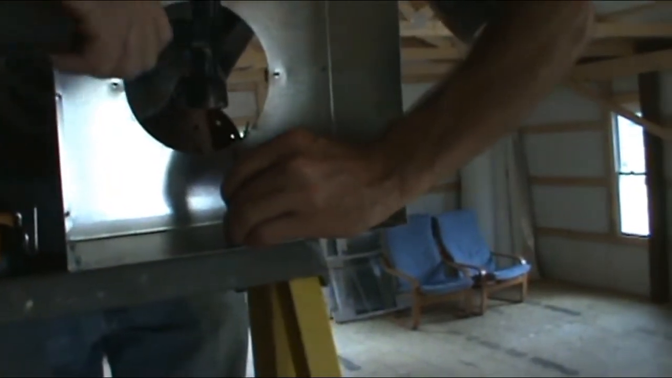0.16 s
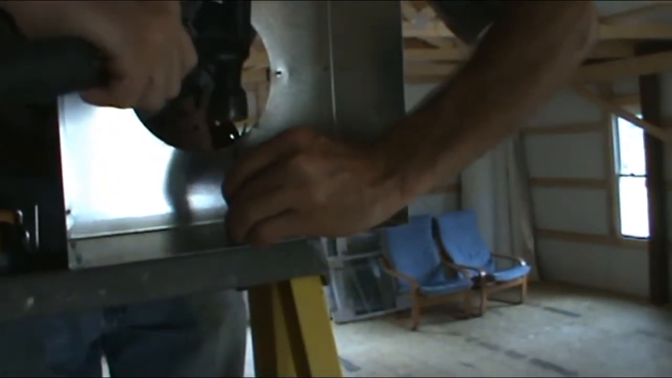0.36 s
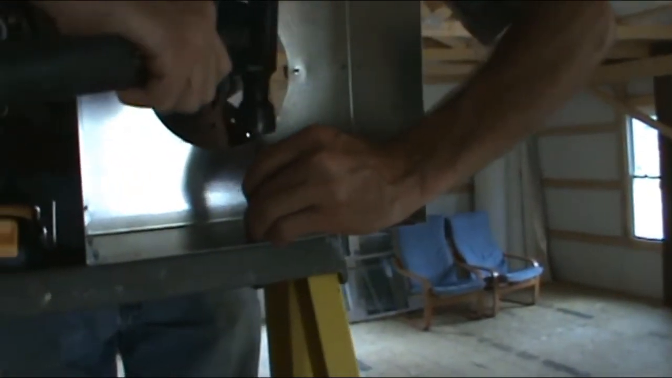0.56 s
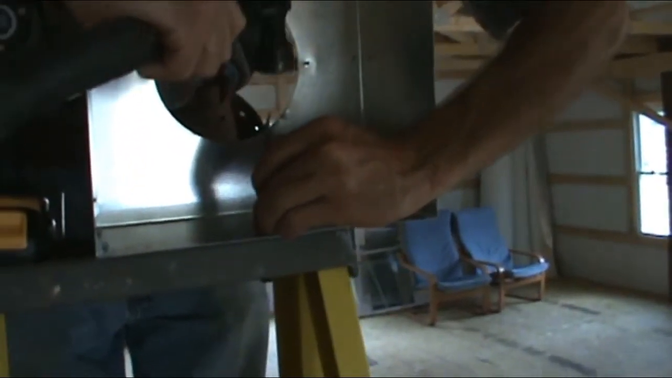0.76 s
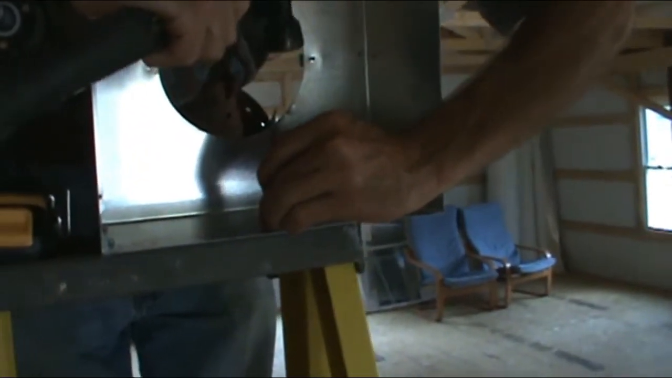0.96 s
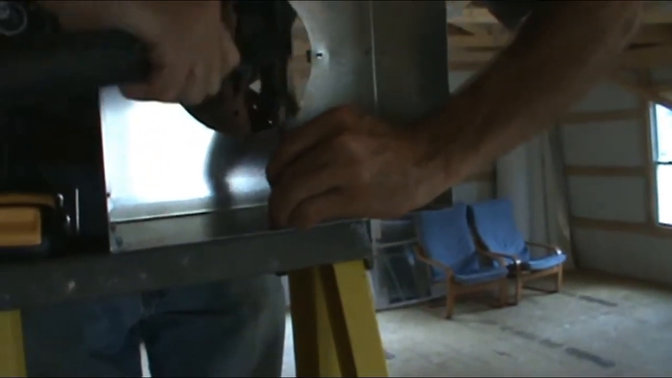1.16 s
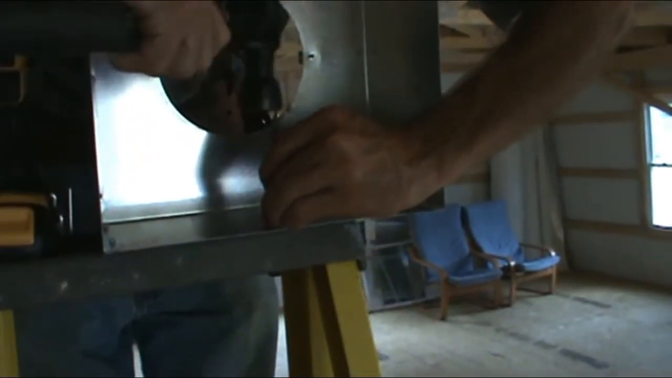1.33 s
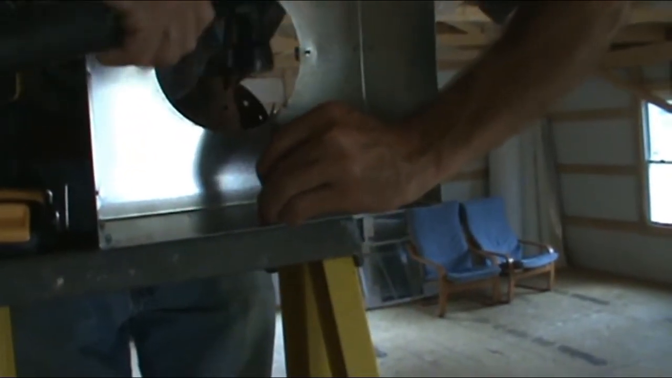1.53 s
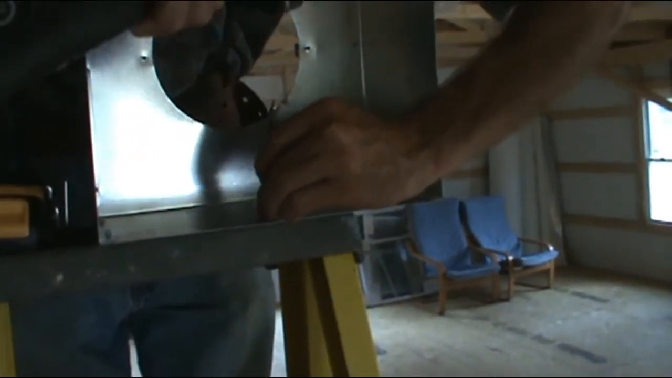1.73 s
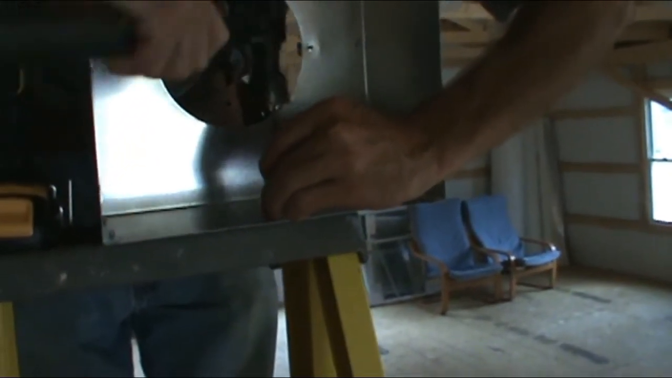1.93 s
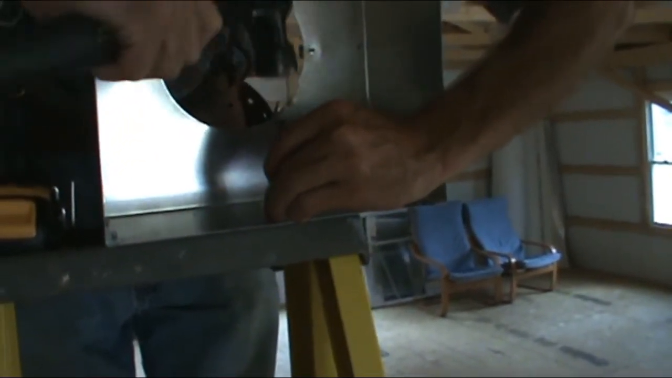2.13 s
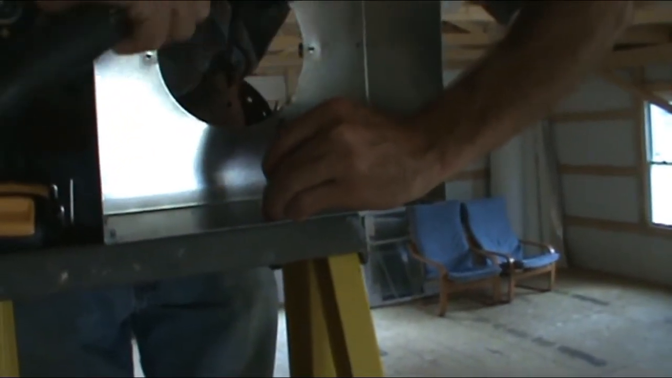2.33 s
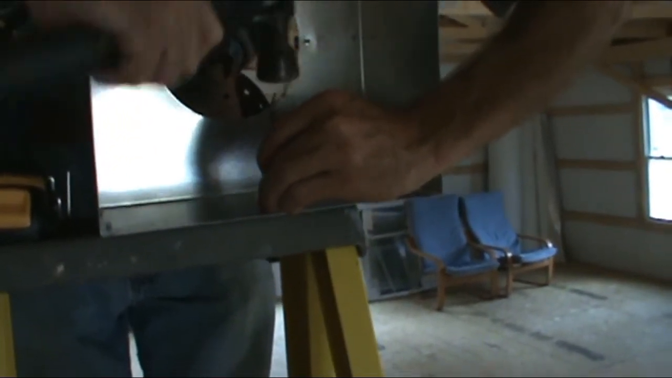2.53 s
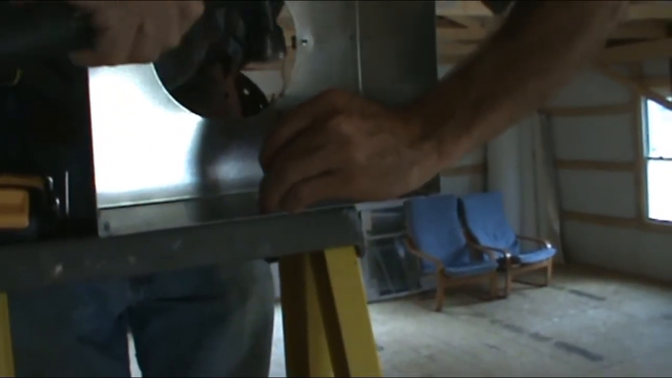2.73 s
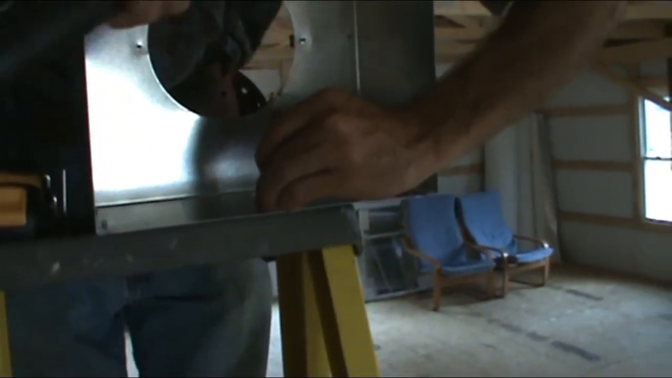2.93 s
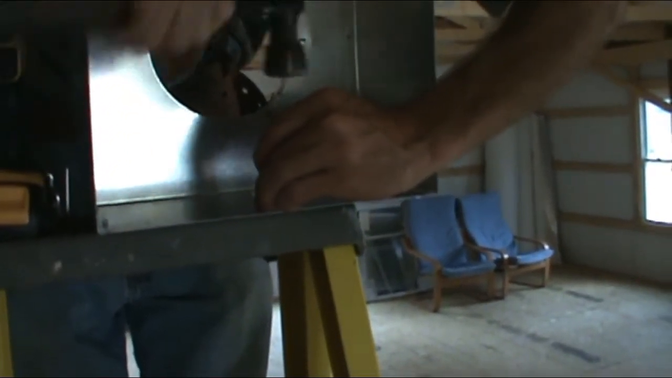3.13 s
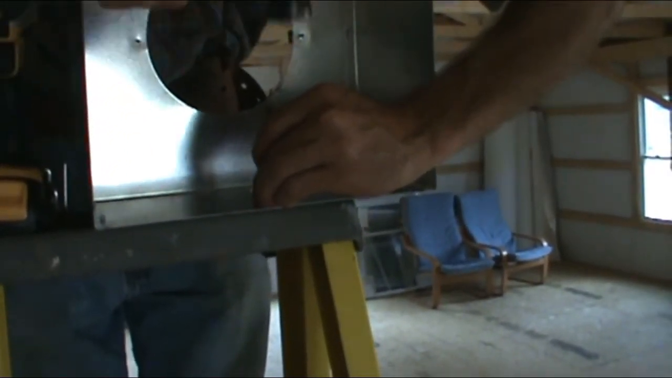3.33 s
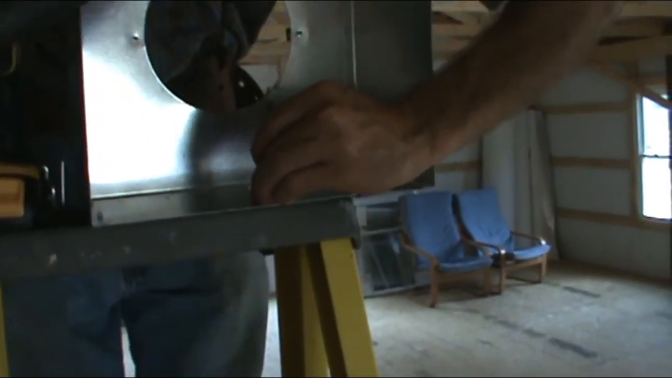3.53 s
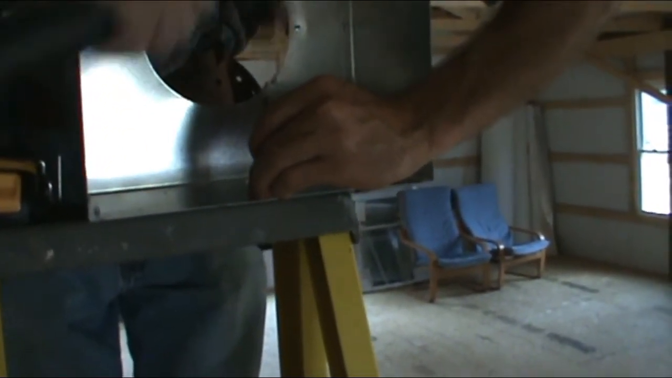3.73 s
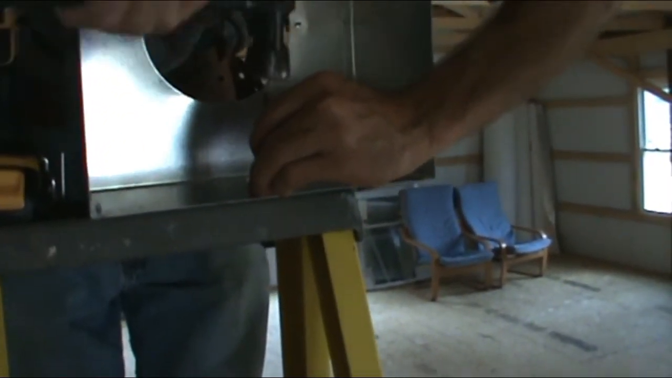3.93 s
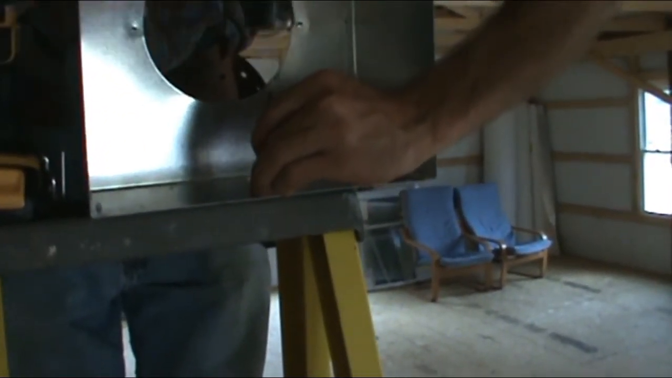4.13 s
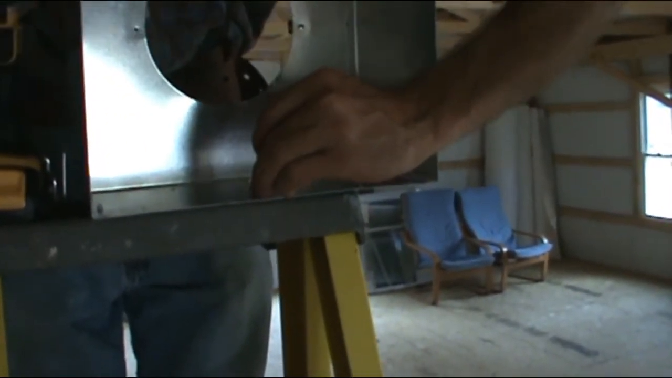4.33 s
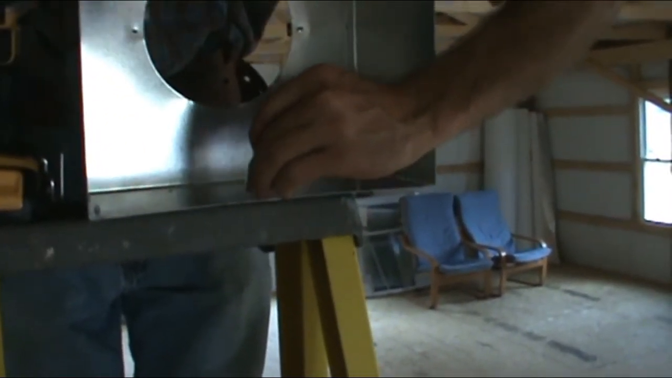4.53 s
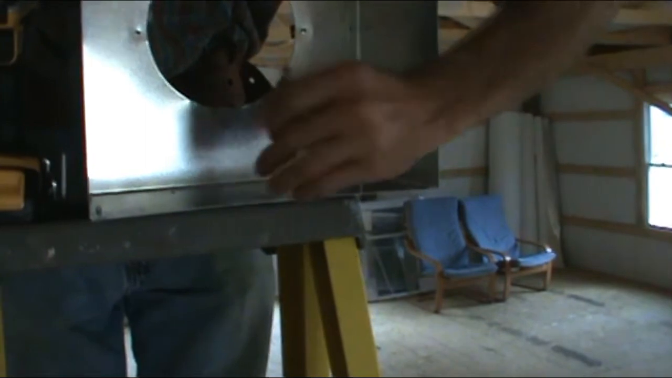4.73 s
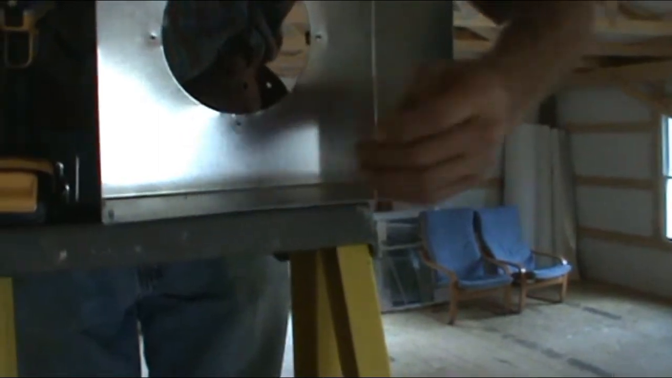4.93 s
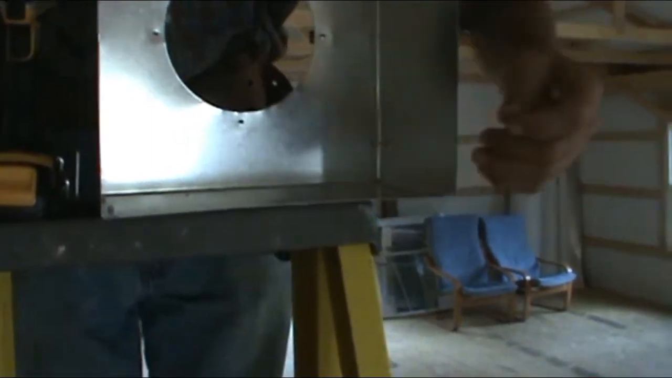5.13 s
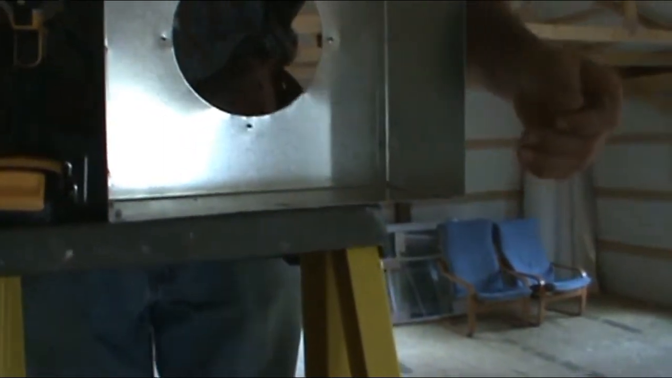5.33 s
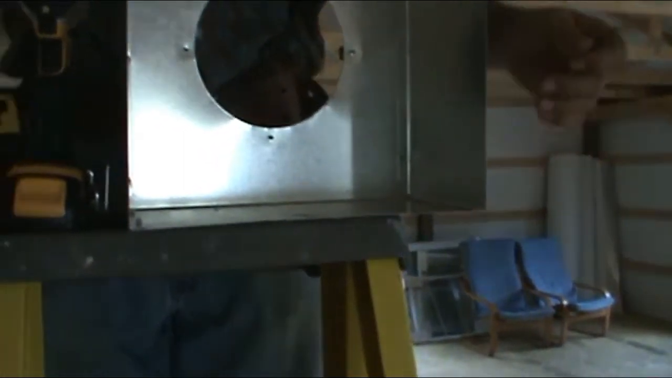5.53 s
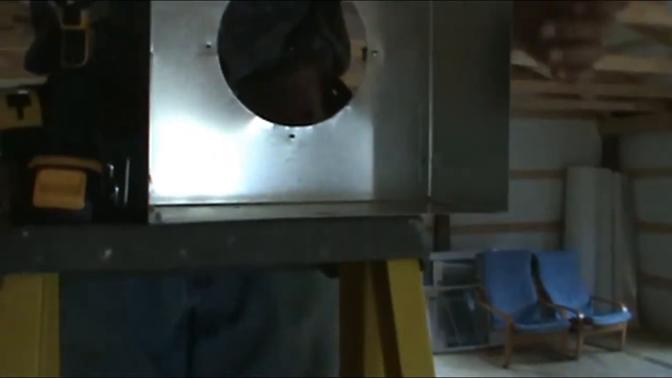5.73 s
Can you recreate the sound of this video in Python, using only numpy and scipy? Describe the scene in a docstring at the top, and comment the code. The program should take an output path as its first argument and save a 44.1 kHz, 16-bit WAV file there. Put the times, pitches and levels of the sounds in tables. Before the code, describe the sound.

A bare, reverberant outbuilding, heard close up through a camcorder's small stereo microphone. Soft hiss, low rumble, a faint whine and quick tape-drive ticking run throughout. A brief rub of hand on metal opens, with a tiny nail tick at 0.3 s. A hammer hits a nail on a sheet-steel duct at 0.6 s: moderate, rather hollow and ringing. A much harder crash follows at 1.25 s, a light dull tap at 1.75, then strong, bright, clattering blows near 1.95, 2.6, 3.15 and 3.85 s, with a small knock just before the one at 3.15. Each swells instantly into dense metallic ringing that decays over about a second, overlapping the next; the gain control holds the peaks down. At 4.3 s a steel tool clinks down, bright and hard. Dull double knocks come at 4.65 s, a softer thump with a tick at 4.85, and a short rub around 5.7 s as the ringing fades.

```python
"""Bare outbuilding: a hammer drives a nail against a sheet-steel duct, close to a camcorder.
Six blows and a light tap set off crowded decaying modes of the sheet, brighter the harder they land;
taps, knocks and a steel clink are contact bursts with a ring, rubs are noise coloured by the duct.
Hiss, whine and ticking of the tape drive lie under it all; a gain control holds the crashes at a
ceiling and recovers more slowly after many blows."""
import sys
import numpy as np
from scipy import signal
from scipy.fft import rfft, irfft, next_fast_len
from scipy.io import wavfile
from scipy.ndimage import uniform_filter1d

SR = 44100
rng = np.random.default_rng(int(sys.argv[2]) if len(sys.argv) > 2 else 0)


def unload_wav(signal):
    """Save mono or channel-first audio to the path in sys.argv[1] as 16-bit WAV at rate SR, clipped to [-1, 1]."""
    wavfile.write(
        sys.argv[1],
        SR,
        np.round(np.clip(np.atleast_2d(signal).T, -1, 1) * 32767).astype(np.int16),
    )


N = 254412


def amp(db):
    """Decibels to gain."""
    return 10 ** (np.asarray(db) / 20)


def read(points, hz):
    """Interpolates a table on a log-frequency axis."""
    point_hz, value = np.transpose(points)
    return np.interp(np.log(hz + 1), np.log(point_hz + 1), value)


def add(mix, start_s, sound):
    """Adds a stereo sound to the mix, cut at the end of the mix."""
    part = mix[:, round(start_s * SR):][:, :sound.shape[1]]
    part += sound[:, :part.shape[1]]


def noise(spectrum, size, tilt_db_per_octave=0):
    """Two unrelated noises of a given spectrum tilted about 1 kHz, scaled to rms 1."""
    hz = np.fft.rfftfreq(size, 1 / SR)
    octaves = np.log2(np.maximum(hz / 1000, 1 / 2))
    gain = amp(read(spectrum, hz) + tilt_db_per_octave * octaves)
    gain = gain / np.sqrt(np.mean(gain ** 2))
    return irfft(rfft(rng.standard_normal((2, size))) * gain, size)


def tinted(x, gain):
    """Applies a gain over frequency (a function of Hz), zero-padded against wrap-around."""
    size = next_fast_len(x.shape[1] + 4096)
    hz = np.fft.rfftfreq(size, 1 / SR)
    return irfft(rfft(x, size) * gain(hz), size)[:, :x.shape[1]]


def humps(peaks, hz):
    """Lift in dB over frequency: a sum of resonance humps."""
    return sum(db / (1 + (2 * (hz - peak_hz) / width_hz) ** 2) for peak_hz, width_hz, db in peaks)


def die_away(x, stretch, build_cycles):
    """Each band builds up over a few cycles, then decays at its own rate, as sheet and room do."""
    # joint ring of sheet and room: freq_hz, t60_s (before stretch)
    ring = [(60, 0.95), (170, 0.97), (420, 1.36), (750, 1.06), (1100, 0.78), (2000, 0.71), (3000, 0.6),
            (5500, 0.53), (8000, 0.52), (15000, 0.45)]
    hz, t, bands = signal.stft(x, SR, nperseg=512)
    build = 1 - np.exp(-(t + 0.0054) * (hz[:, None] + 20) / build_cycles)
    t60_s = stretch * read(ring, hz)[:, None]
    fall = amp(-60 * t / t60_s)
    return signal.istft(bands * build * fall, SR, nperseg=512)[1][:, :x.shape[1]]


def modes(table, size, stretch, scatter_db, detune=0):
    """Decaying sines; struck spot and grip vary the share and pitch of each a little."""
    t, out = np.arange(size) / SR, np.zeros((2, size))
    for hz, db, t60_s in table:
        phase = rng.uniform(0, 2 * np.pi)
        share = amp(db + scatter_db * rng.standard_normal())
        mode_hz = hz * (1 + detune * rng.standard_normal())
        angle = 2 * np.pi * mode_hz * t + phase
        decay = np.exp(-np.log(1000) * t / (t60_s * stretch))
        out += share * decay * [np.cos(angle), rng.choice([-1, 1]) * np.sin(angle)]
    return out


def small_hits(rows, spectrum, direct_db, direct_s, stretch):
    """A contact burst, shorter the brighter it is, then its ring in the room."""
    db_per_halving = 5.5  # rise in tilt (dB per octave) that halves the contact time
    out, t = np.zeros((2, N)), np.arange(SR) / SR
    for start_s, db, tilt_db_per_octave in rows:
        contact_s = direct_s * 2 ** (-tilt_db_per_octave / db_per_halving)
        burst = amp(direct_db) * noise(spectrum, SR, tilt_db_per_octave) * np.exp(-t / contact_s)
        ringing = die_away(noise(spectrum, SR), stretch, build_cycles=1.3)
        add(out, start_s, amp(db) * (burst + ringing))
    return out


def background(tick_db=-50, tick_s=0.0054, first_s=0.0059):
    """Shaped noise for hiss and room rumble, sines for drive whine, decaying noise for its ticks."""
    # hiss and rumble: freq_hz, density_db (relative)
    hiss, hiss_rms_db = [(15, -49.5), (25, -22.5), (70, -8), (108, 8), (256, -5.5), (301, -7), (405, -12),
                         (607, -16), (2410, -14.5), (2990, -22), (3340, -15), (3720, -20.5), (7920, -16.5),
                         (8830, -19), (16000, -25.5)], -51.5
    # drive tones: freq_hz, rms_db
    whine_tones = [(102, -65), (404, -70), (1906, -70.5), (2832, -78.5), (8134, -68.5)]
    # drive tick spectrum: freq_hz, density_db (relative)
    tick_spectrum, ticks_per_s = [(200, -7), (1200, -19), (2100, 5.5), (3000, 3.5), (4800, -13.5),
                                  (6200, 4), (7200, -14.5), (16000, -30)], 30
    t = np.arange(N) / SR
    whine = np.zeros((2, N))
    for hz, rms_db in whine_tones:
        phase = rng.uniform(0, 2 * np.pi, (2, 1))
        whine += np.sqrt(2) * amp(rms_db) * np.sin(2 * np.pi * hz * t + phase)
    since_tick_s = (t - first_s) % (1 / ticks_per_s)
    ticking = amp(tick_db) * noise(tick_spectrum, N) * np.exp(-since_tick_s / tick_s)
    return amp(hiss_rms_db) * noise(hiss, N) + whine + ticking


def rubs(grain_db=0.5):
    """Hand and sleeve on metal: uneven noise that swells with the push, coloured by the duct."""
    # rubs: start_s, push_s, level_db (at the end of the push, before the duct's lift)
    rub_rows = [(0.0, 0.0062, -47.5), (0.1, 0.09, -52), (5.67, 0.065, -43.5)]
    # rubbing spectrum: freq_hz, density_db (relative)
    colour = [(60, -12.5), (110, -6), (200, -11), (450, -4.5), (800, -1), (1400, -3.5), (2000, -10.5),
              (2900, -15), (3350, -11), (3900, -21.5), (9000, -29.5), (16000, -46)]
    # duct resonances: freq_hz, width_hz, lift_db
    duct_peaks = [(452, 46, 9.5), (732, 45, 11), (1260, 47, 7), (1900, 40, 7.5), (3330, 50, 7)]
    catch_s, swell_range_db, fade_db_per_s = 0.005, 4, 73
    t, level = np.arange(N) / SR, np.zeros(N)
    for start_s, push_s, db in rub_rows:
        swell_db = swell_range_db * (np.clip((t - start_s) / push_s, 0, 1) - 1)
        fade_db = fade_db_per_s * np.maximum(t - start_s - push_s, 0)
        catch = np.clip((t - start_s) / catch_s, 0, 1)
        level = np.hypot(level, catch * amp(db + swell_db - fade_db))
    grain = uniform_filter1d(rng.standard_normal(N), size=200)
    friction = tinted(noise(colour, N), lambda hz: amp(humps(duct_peaks, hz)))
    return friction * level * amp(grain_db * grain / grain.std())


def nail_ticks():
    """Nail touching the sheet: a strong, very short contact burst and a fainter ring."""
    # touches: start_s, level_db, contact_tilt_db_per_octave
    touches = [(0.318, -55, 3), (1.236, -74, 6), (2.537, -58, 3.5), (4.847, -41, 1), (5.058, -66, 3.5)]
    # spectrum: freq_hz, density_db (relative)
    spectrum = [(200, -8), (1200, -6.5), (2200, -8.5), (3300, -12.5), (4800, -5), (6200, 3), (7500, -7),
                (9500, -14), (12000, -32), (16000, -29)]
    return small_hits(touches, spectrum, direct_db=18.5, direct_s=0.0031, stretch=0.96)


def crowding(size, ripple_db, spacing_hz):
    """Gain of overlapping high modes: broad clusters and a fine uneven ripple."""
    # clusters of high modes: freq_hz, width_hz, lift_db
    clusters = [(1864, 49, 3), (2597, 45, 2.5), (2920, 57, -2.5), (4370, 150, 4.5), (4600, 250, 2),
                (5660, 350, 3.5), (6530, 110, 0.5), (7970, 190, 0.5), (11440, 260, 3), (12700, 180, 6)]
    hz = np.fft.rfftfreq(size, 1 / SR)
    ripple = np.interp(hz / spacing_hz, np.arange(2 ** 10), rng.standard_normal(2 ** 10))
    return amp(humps(clusters, hz) + ripple_db * ripple * np.minimum(hz / 2500, 1))


def in_room(x, wet_db, stretch):
    """Adds the bare room's dense echoes, which make steady tones swell and beat."""
    tail = die_away(rng.standard_normal((2, SR // 2)), stretch, build_cycles=1.9)
    tail = tail / np.linalg.norm(tail[0])
    echoes = signal.fftconvolve(x, tail, axes=1)[:, :x.shape[1]]
    return x + amp(wet_db) * echoes


def hammer(alike=0.36, swell_s=0.0023, modes_db=-3.0):
    """Each blow excites crowded sheet modes, partly alike every time, plus modes that stand out."""
    # hammer on nail: start_s, force_db, ring_time_factor
    blows = [(0.590, -5.5, 0.81), (1.251, 8.5, 0.85), (1.76, -11.5, 0.59), (1.962, 11.5, 0.84),
             (2.586, 13, 0.85), (3.167, 13, 0.91), (3.852, 10.5, 0.98)]
    # crowded sheet resonances at the blow: freq_hz, density_db (relative)
    sheet = [(30, -24), (80, -8.5), (150, -5), (280, -6), (430, -3), (600, -6.5), (740, 1), (1050, -2.5),
             (1750, -2), (3200, -5), (6000, -10), (8500, -9.5), (12000, -12), (16000, -21)]
    # prominent modes: freq_hz, resting_nail_db, biting_nail_db (relative), t60_s (before stretch)
    sheet_modes = [(144.4, -22.5, -22.5, 1.35), (192.6, -17, -32, 1.9), (280.5, -20.5, -27, 1.187),
                   (396, -33.5, -21.5, 1.33), (423.7, -30, -23, 1.07), (432.4, -14, -31, 1.34),
                   (443, -28, -18, 1.21), (482.4, -13, -25, 1.4), (547.5, -31.5, -19.5, 1.13),
                   (703, -20, -15, 0.88), (732.5, -23, -19, 1.08), (761, -25, -12, 0.58),
                   (884, -10.5, -30, 0.76), (911, -23.5, -25.5, 1.26), (1173, -17.5, -19.5, 0.95),
                   (1280, -15, -13, 0.5), (1620, -22, -30, 0.44), (1640, -18, -25, 0.58),
                   (1690, -10.5, -29, 0.54), (1790, -13, -21, 0.88), (1945, -27, -21, 0.77),
                   (2830, -34.5, -21, 0.73)]
    full_treble_db, dulling_db_per_octave_per_db = 15, 0.11
    bite_from_db, bite_range_db = -2, 11.5  # nail only rests below the first, bites fully at their sum
    out, size = np.zeros((2, N)), 2 ** 16
    colour = crowding(size, ripple_db=3.0, spacing_hz=54.66)
    usual = noise(sheet, size)
    # bending waves take a moment to fill the sheet
    swell = 1 - np.exp(-np.arange(size) / SR / swell_s)
    for start_s, force_db, stretch in blows:
        tilt_db_per_octave = dulling_db_per_octave_per_db * (force_db - full_treble_db)
        bite = np.clip((force_db - bite_from_db) / bite_range_db, 0, 1)
        crowd = np.sqrt(alike) * usual + np.sqrt(1 - alike) * noise(sheet, size)
        crowd = die_away(irfft(rfft(crowd) * colour, size), stretch, build_cycles=0.88)
        # the biting nail pins the sheet, which shifts the blow to other modes
        table = [(hz, resting_db + bite * (biting_db - resting_db), t60_s)
                 for hz, resting_db, biting_db, t60_s in sheet_modes]
        tones = modes(table, size, stretch, scatter_db=1.07, detune=0.002)
        tones = in_room(tones, wet_db=-6.0, stretch=0.77)
        crash = swell * (crowd + amp(modes_db) * tones)

        def softness(hz):
            """A softer blow excites less treble."""
            return amp(tilt_db_per_octave * np.log2(1 + (hz / 1200) ** 2) / 2)

        add(out, start_s, amp(force_db) * tinted(crash, softness))
    return out


def taps_and_knocks():
    """Taps and knocks, mostly dull, one with a crisp attack, and a soft thump: bursts and a ring."""
    # hits: start_s, level_db, contact_tilt_db_per_octave
    hits = [(3.074, -19.5, 0.5), (4.655, -19, 7), (4.674, -21.5, -3), (4.802, -41, 0), (4.847, -27, -8)]
    # spectrum: freq_hz, density_db (relative)
    spectrum = [(60, -21.5), (200, -8.5), (700, -2.5), (1300, -1.5), (2400, -7), (3500, -20), (6000, -21),
                (9000, -38), (16000, -44)]
    return small_hits(hits, spectrum, direct_db=2, direct_s=0.0059, stretch=1.06)


def clink():
    """Steel tool set down: a hard contact burst and the tool's high modes."""
    # clinks: start_s, level_db, contact_tilt_db_per_octave
    clink_rows = [(4.280, -10.5, 3.2)]
    # spectrum: freq_hz, density_db (relative)
    spectrum = [(100, -16), (400, -14), (700, -10), (1200, -4.5), (3200, -5.5), (3580, 0.5), (3850, 1),
                (4280, 0), (5100, -2), (6250, -2), (7200, -9), (10000, -17.5), (12000, -17), (16000, -26)]
    # tool modes: freq_hz, level_db (relative), t60_s (before stretch)
    tool_modes = [(636, -16, 1), (2770, -14, 0.56), (3590, -5, 0.57), (3601, -4, 0.48), (3900, -14, 0.36),
                  (4230, -5, 0.22), (4270, 1, 0.35), (4680, -8, 0.27), (5400, -14.5, .45),
                  (6200, -9.5, 0.53), (6300, -11, 0.53), (11560, -20, 0.55), (12930, -27, 0.7),
                  (13920, -26, 0.65)]
    out = small_hits(clink_rows, spectrum, direct_db=5.0, direct_s=0.011, stretch=0.93)
    for start_s, db, _ in clink_rows:
        add(out, start_s, amp(db) * modes(tool_modes, SR, stretch=0.74, scatter_db=1.5))
    return out


def ports(x):
    """Two closely spaced microphone ports: partly alike, with phase lead and balance by frequency."""
    # freq_hz, likeness (clipped to 0.98)
    likeness = [(30, 1.1), (90, 1), (290, 0.8), (640, 0.52), (1400, 0.78), (3100, 0.67), (6800, 0.8),
                (15000, 0.9)]
    # freq_hz, left_lead_rad
    left_lead = [(60, 0.08), (340, 0.18), (1000, 1), (1700, 0.63), (3100, 0.63), (6500, 0.66), (12000, .05)]
    # freq_hz, left_minus_right_db
    balance = [(60, -1), (380, -0.5), (700, -2.5), (1300, -0.2), (8000, 0)]
    size = next_fast_len(N + 4096)
    hz = np.fft.rfftfreq(size, 1 / SR)
    left, other = rfft(x, size)
    same = np.clip(read(likeness, hz), 0, 0.98)
    side = amp(read(balance, hz) / 2)
    right = (same * left + np.sqrt(1 - same ** 2) * other) * np.exp(-1j * read(left_lead, hz))
    return irfft(np.array([left * side, right / side]), size)[:, :N]


def scene():
    """All sources at the microphone."""
    return ports(background() + rubs() + nail_ticks() + hammer() + taps_and_knocks() + clink())


def record(dry, ceiling_db=-9.0, recovery_db_per_s=130, slow_s=2.67, slow_share=1.67):
    """Gain control with a ceiling and a fast and a slow recovery, then clipping and band limit."""
    power = abs(uniform_filter1d((dry ** 2).mean(0), size=260))
    power_db = 10 * np.log10(power + 1e-12)
    # peak hold that falls at the recovery rate
    fall_db = np.arange(N) * recovery_db_per_s / SR
    held_db = np.maximum.accumulate(power_db + fall_db) - fall_db
    over_db = np.maximum(held_db - ceiling_db, 0)
    # slow average: repeated blows keep the gain down for longer
    leak = 1 / (slow_s * SR)
    lasting_db = slow_share * signal.lfilter([leak], [1, leak - 1], over_db)
    cut_db = uniform_filter1d(np.maximum(over_db, lasting_db), size=60)
    clipped = np.clip(dry / amp(cut_db), -1, 1)
    band_limit = signal.firwin(511, 16000, window=("kaiser", 8), fs=SR)
    return signal.oaconvolve(clipped, band_limit[None], "same")


dry = scene()
out = record(dry)
unload_wav(out)
```